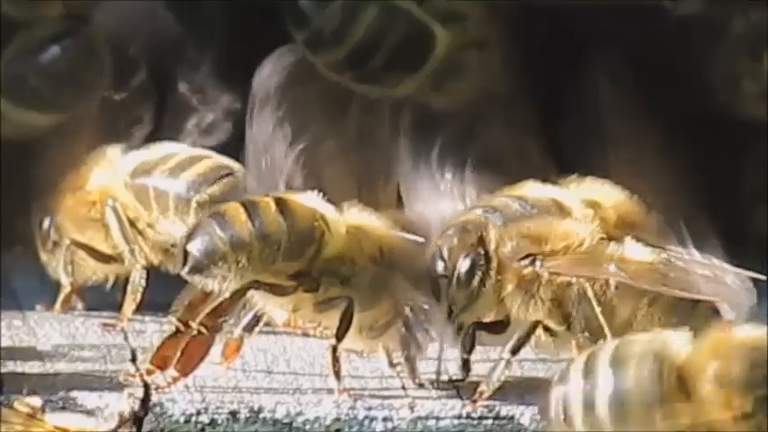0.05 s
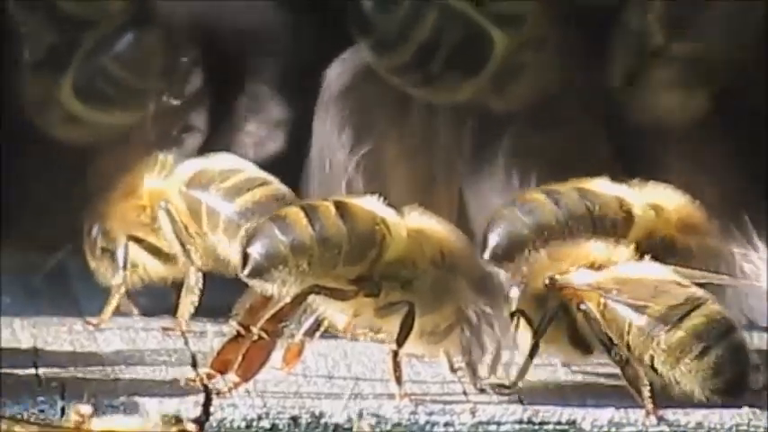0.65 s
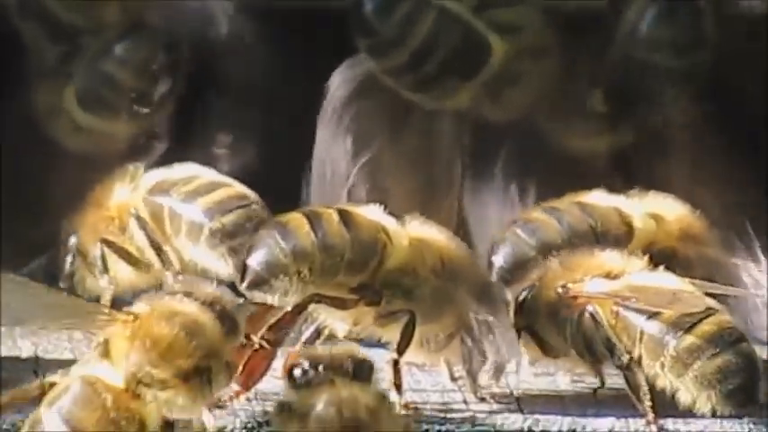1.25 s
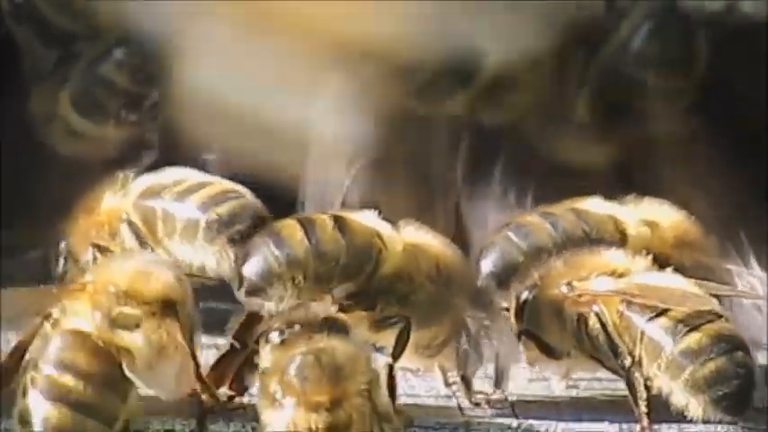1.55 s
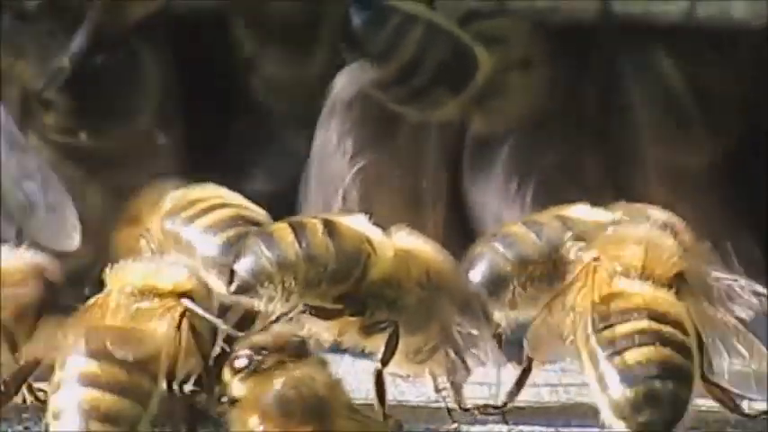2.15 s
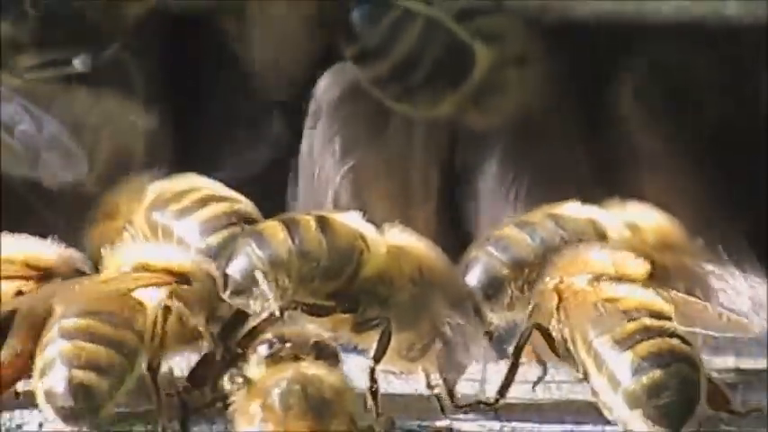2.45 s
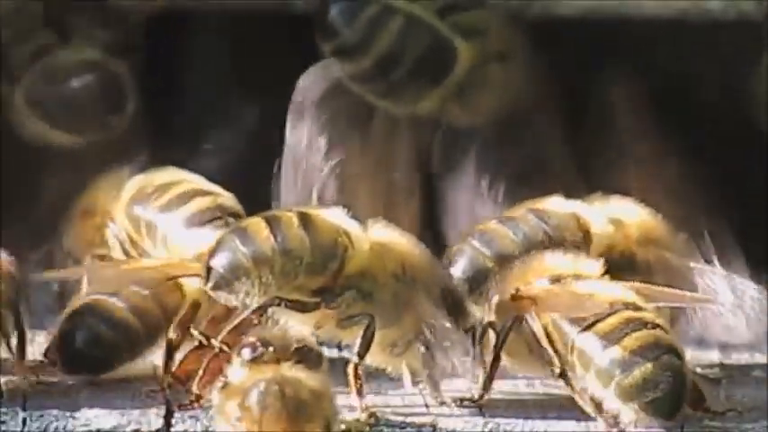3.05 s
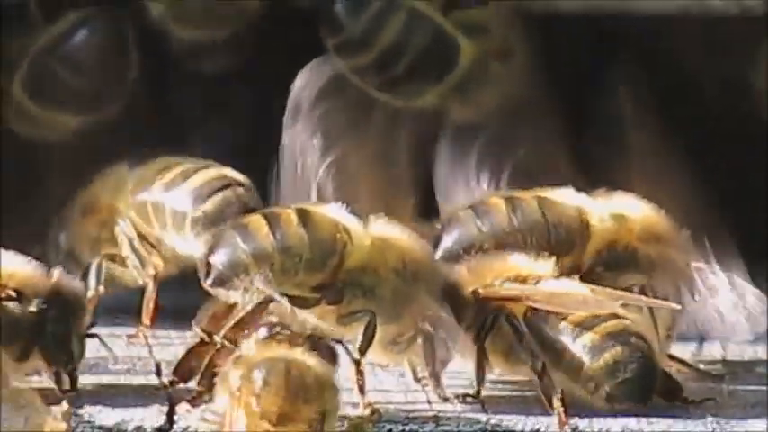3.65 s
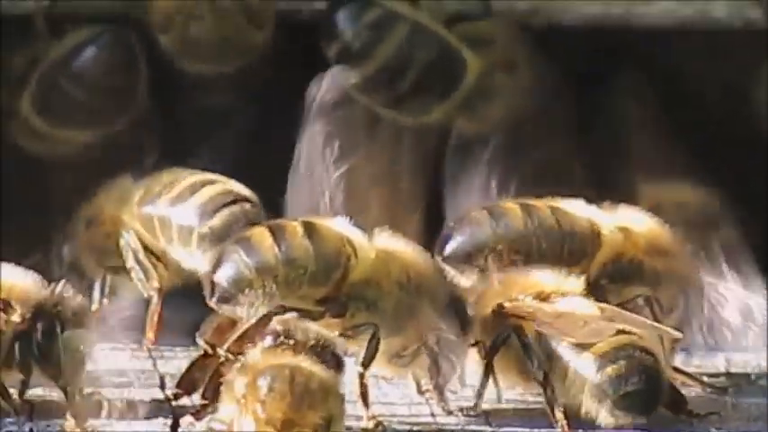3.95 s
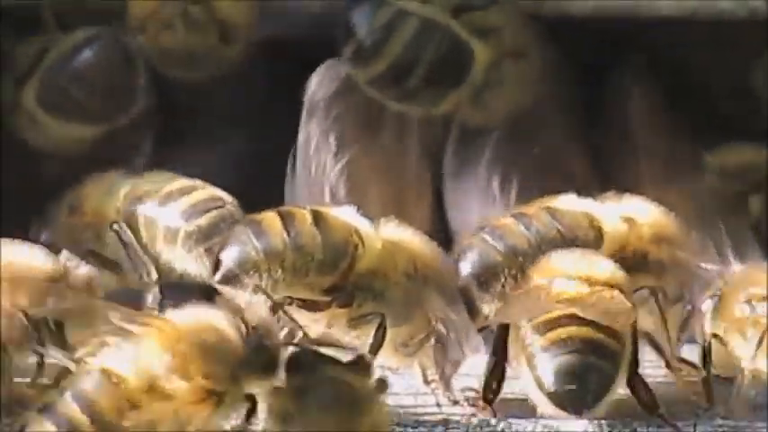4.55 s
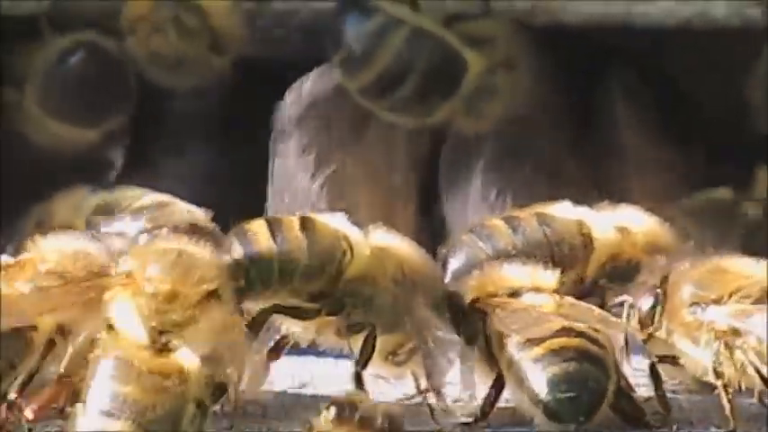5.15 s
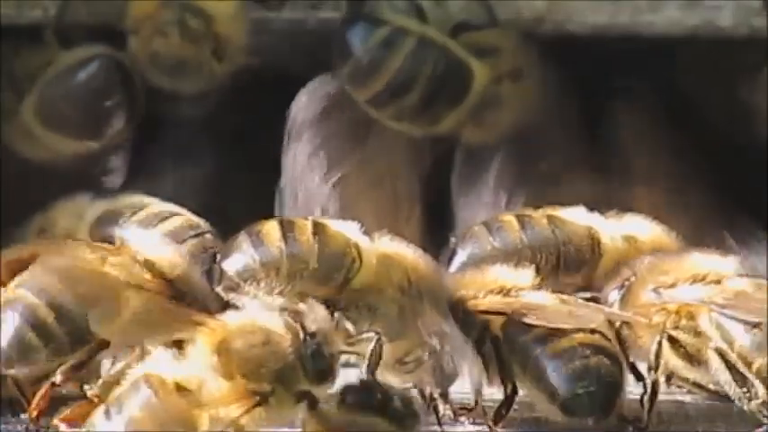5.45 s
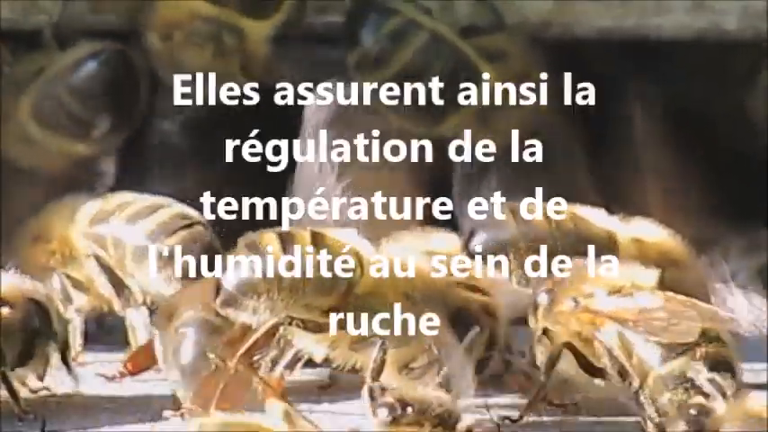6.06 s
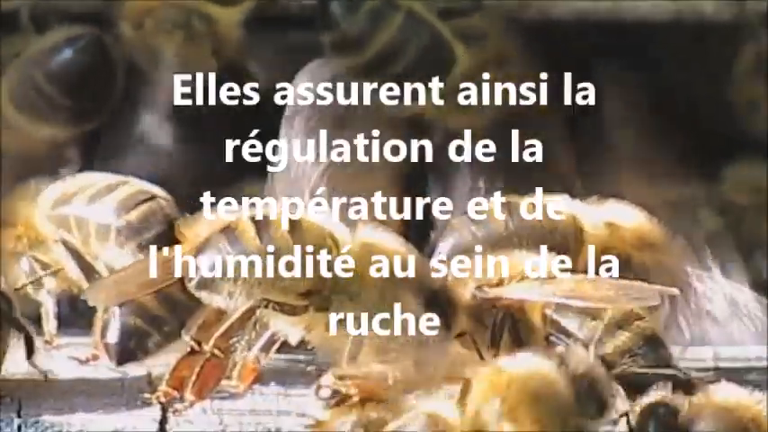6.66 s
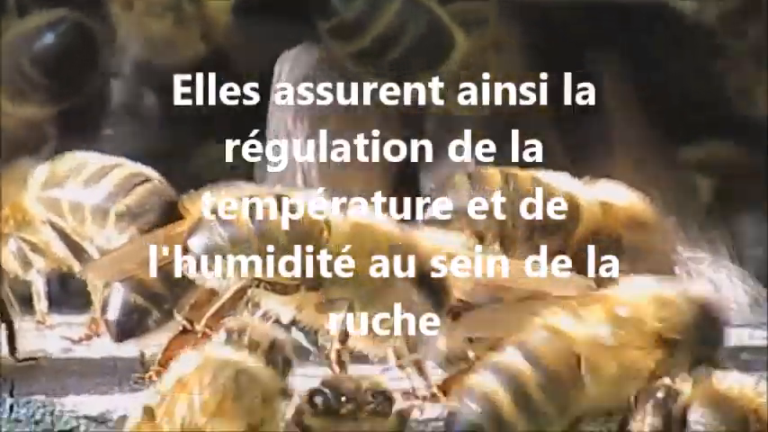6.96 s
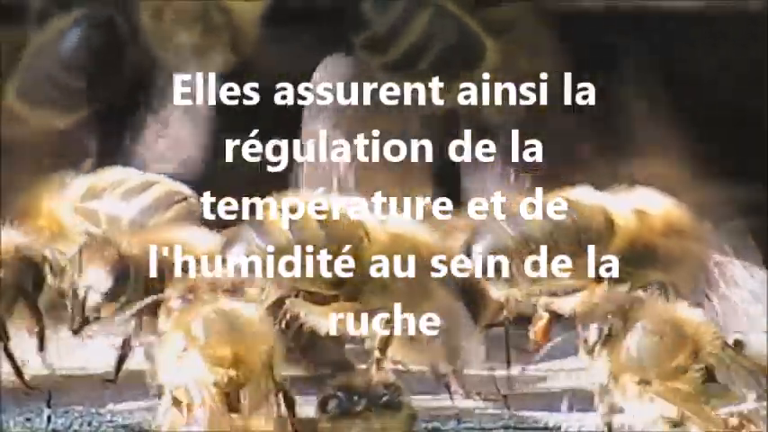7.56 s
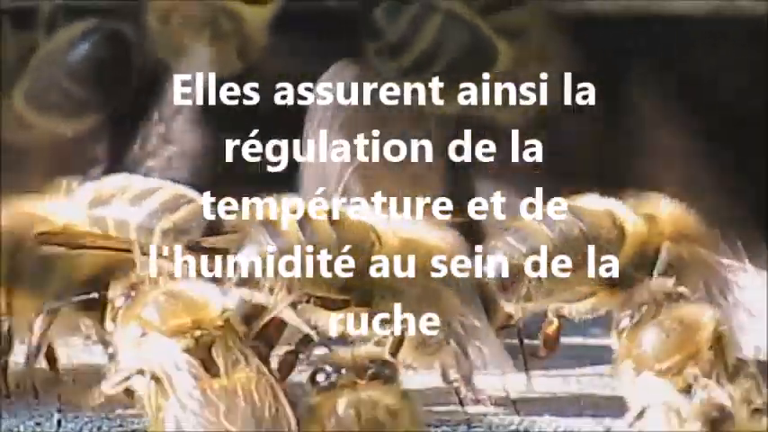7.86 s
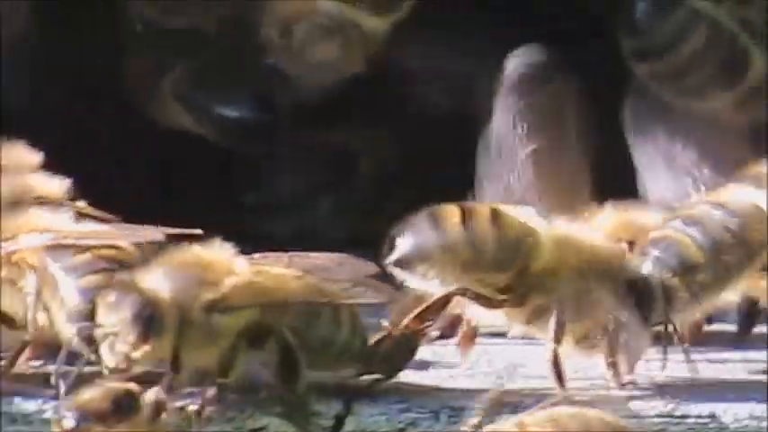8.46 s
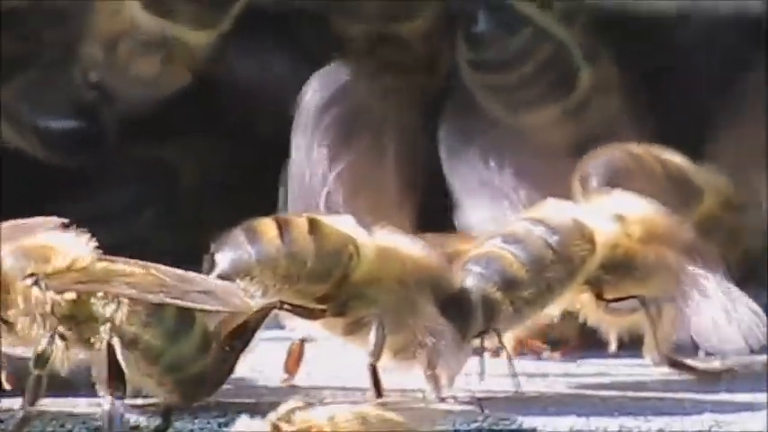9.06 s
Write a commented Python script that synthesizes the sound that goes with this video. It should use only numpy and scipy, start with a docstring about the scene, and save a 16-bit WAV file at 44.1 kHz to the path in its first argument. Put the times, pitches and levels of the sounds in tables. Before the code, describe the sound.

Honeybees fan their wings close by at an outdoor hive entrance, making a quiet, low, pulsing hum that swells and dips over a soft rush of air and faint hiss. A dull wooden knock sounds at 0.4 seconds. In the background, a bird sings four trills of quickly repeated falling notes, at about 0.2, 2.1, 4.9 and 6.7 seconds, each under a second long and echoing lightly among trees. Short chirps and whistles are scattered between 0.8 and 3.5 seconds. A buzzy, wheezing call runs from 3 to 4 seconds, then a faint, thin, distant song until about 6.3. A few more whistles come after 7.3. At 7.9 the sound drops out for a third of a second. It returns with a short rustle and a thinner, higher, softer hum. A sharp wooden tick and a tiny high bird call come around 8.9 seconds.

```python
"""Honeybees fan their wings at a hive entrance: each wingbeat pushes the air, and together
they make a low, pulsing hum over a soft rush of air. There are four birdsong trills, each a
quickly repeated falling note with its own echo. Birds also chirp, whistle and buzz among the
trees, and wood rings from two knocks. Near the end the sound drops out briefly, then comes
back with a short rustle and a thinner, higher hum."""
import sys
import numpy as np
from scipy import signal
from scipy.fft import rfft, irfft
from scipy.io import wavfile

SR = 44100
rng = np.random.default_rng(int(sys.argv[2]) if len(sys.argv) > 2 else 0)


def store_wav(level_fs):
    """Save 16-bit WAV to argv[1]."""
    pcm = np.round(np.clip(np.atleast_2d(level_fs), -1, 1) * 32767)
    wavfile.write(sys.argv[1], SR, pcm.T.astype(np.int16))


N = 410130
TIME = np.arange(N) / SR
DROPOUT_START_S, DROPOUT_END_S = 7.912, 8.237
AFTER_DROPOUT = TIME > (DROPOUT_START_S + DROPOUT_END_S) / 2
LATE_WINGBEAT_HZ = 161.5  # the bees beat faster after the dropout

# narrow treble bands that are turned down: (frequency [Hz], width [Hz], depth [dB])
TREBLE_DIPS = [(3976, 340, -11), (8000, 240, -15.5)]
# how long echoes last among the trees: (frequency [Hz], time to fade by 60 dB [s])
ECHO_TIMES = [(300, 0.16), (2000, 0.4), (3300, 0.74), (6000, 0.6), (8000, 0.033)]
# how the low rumble of moving air rises and falls: (time [s], level [dB])
RUMBLE_LEVELS = [(0, -62), (.45, -63), (.65, -56), (1, -60.5), (2.3, -65), (3, -61), (4.15, -62.5),
                 (4.32, -59), (4.5, -65), (7.9, -62.5), (8.25, -76), (9.3, -72)]
# the tone of that rumble: (frequency [Hz], level [dB])
RUMBLE_SPECTRUM = [(15, -22), (30, -12), (48, -5.5), (65, -3), (80, -5), (105, 0), (140, -34.5),
                   (220, -43.5)]
# the part of the rushing air that both ears share: (frequency [Hz], level [dB])
RUSH_SHARED = [(40, -15.5), (200, -4.5), (430, -5.5), (540, -2.5), (740, -0.5), (920, -4.5), (1150, -4.5),
               (1900, -10.5), (3400, -13), (4500, -16.5), (7000, -24), (15000, -34.5)]
# the part that is opposite at the two ears: (frequency [Hz], level [dB])
RUSH_OPPOSITE = [(20, -21), (60, -5), (130, -1), (280, 2), (680, 0.5), (920, -3), (1130, -4), (1900, -9.5),
                 (3400, -14), (4500, -16.5), (6600, -17.5), (7600, -33.5), (15000, -51.5)]
# the tone of the microphone's hiss: (frequency [Hz], level [dB])
HISS_SPECTRUM = [(500, -7), (3500, 2), (5200, 2.5), (7500, 5), (9000, 3), (13500, 1.5), (15000, -15.5)]
# the tone of the rustle: (frequency [Hz], level [dB])
RUSTLE_SPECTRUM = [(100, -33), (270, 4), (500, -1), (780, 8.5), (1100, -1), (1800, -19), (3500, -20),
                   (8000, -55)]

# a dull knock on the hive board: (time [s], level [dB], brightness [dB/octave], left over right [dB])
BOARD_KNOCKS = [(.3905, -39.5, 5, 3), (0.3922, -30, 1, 1)]
# the tones the board rings with: (frequency [Hz], level [dB], time to fade by 60 dB [s])
BOARD_TONES = [(307, -8.5, 0.077), (578, -5, 0.045), (656, -5, 0.096), (784, 3, 0.032),
               (1054, -10.5, 0.054), (1220, -7.5, 0.026), (1538, -7.5, 0.078), (1940, -9.5, 0.03),
               (2140, -13, 0.037), (2820, -14, 0.026)]
# a sharp tick and its bounce: (time [s], level [dB], brightness [dB/octave], left over right [dB])
SLAT_TICKS = [(8.8864, -30.5, 4.5, -3), (8.9017, -45, 8, 2)]
# the tones of the ticked wooden slat: (frequency [Hz], level [dB], time to fade by 60 dB [s])
SLAT_TONES = [(389, 5.5, 0.056), (516, -1.5, 0.068), (1030, 4.5, 0.015), (1250, 3.5, 0.015),
              (1800, 0.5, 0.023), (2070, 4.5, 0.0083), (2290, 0, 0.0082), (2630, -19, .007)]

# a far bird's thin song: (start [s], length [s], pitch [Hz], opening rise [octaves],
# closing fall [octaves], roughness [share of pitch], level [dB])
SONG_NOTES = [(3.84, 0.29, 6350, .04, 0, 0.013, -67), (4.25, .25, 5610, .28, 0.0088, .015, -59.5),
              (4.33, .28, 6430, 0.024, .02, .008, -66), (4.5, 0.14, 5370, 0.023, .06, 0.026, -61),
              (4.748, 0.35, 6360, 0.025, 0.0079, 0.013, -65), (5.1, 0.083, 5960, 0.11, 0.0045, 0.018, -60),
              (5.18, .2, 6090, 0.0084, .12, .014, -57.5), (5.5, .11, 5810, .05, 0, 0.021, -61),
              (5.69, .08, 5960, 0, .05, .02, -65), (6.09, .25, 5390, 0.21, 0, .035, -65)]
# tiny, very high calls: (start [s], pitch [Hz], roughness [share of pitch], level [dB])
PIP_NOTES = [(.422, 7340, 0.013, -51), (1.529, 7460, 0.038, -52), (7.765, 7380, 0.037, -51),
             (8.925, 7680, .005, -41.5)]
# held whistles: (start [s], length [s], middle pitch [Hz], slide [octaves], level [dB])
WHISTLE_NOTES = [(1.123, 0.075, 2710, -0.17, -54.5), (1.214, 0.03, 3540, -.04, -51),
                 (1.41, .045, 3470, -0.0081, -56), (1.48, 0.11, 2004, -0.036, -57),
                 (1.69, 0.044, 2700, -.08, -57), (1.8, 0.14, 1890, -0.105, -60),
                 (2.19, 0.088, 2230, -0.084, -53.5), (2.41, 0.13, 2170, -0.052, -52.5),
                 (7.36, 0.14, 2037, 0.085, -59), (7.646, 0.03, 1855, -0.025, -51.5),
                 (7.81, 0.1, 3120, -0.25, -53.5), (8.455, .035, 4520, -.03, -62)]
# short chirps: (start [s], length [s], middle pitch [Hz], slide [octaves], arch [octaves], level [dB])
CHIRP_NOTES = [(0.804, 0.025, 1210, -.3, 0, -52.5), (0.805, 0.023, 2300, -0.25, 0.0046, -49),
               (.83, 0.034, 2080, -0.505, 0.036, -50), (0.854, 0.022, 1446, -0.37, 0.053, -48.5),
               (0.978, .03, 1896, -0.54, 0.018, -43), (1.21, 0.024, 2230, 0.46, 0.17, -49.5),
               (1.241, 0.024, 1870, -0.51, 0.048, -48.5), (1.381, 0.034, 1900, -.48, 0.03, -43.5),
               (1.616, 0.033, 1934, -0.44, 0.023, -47.5), (2.098, 0.03, 1960, -0.34, -0.0077, -51),
               (2.693, 0.028, 1886, -0.45, -0.0065, -49.5), (2.979, 0.034, 2210, -0.23, 0.0093, -55),
               (3.037, 0.032, 1360, -0.25, 0.018, -50.5), (3.257, 0.015, 2060, -0.48, -0.012, -51),
               (3.435, 0.035, 2106, -.45, 0, -51), (3.473, 0.013, 2060, 0.46, 0.016, -52),
               (3.474, 0.014, 1410, 0.48, -0.022, -48), (3.49, 0.017, 1816, -0.64, -0.012, -48)]
# tones that linger around the trills and the wheeze: (frequency [Hz], width [Hz], level [dB])
LINGERING_TONES = [(2980, 30, -6), (3175, 16, -2), (3218, 16, 3), (3490, 22, 0), (3680, 20, -2),
                   (3768, 20, 3), (4040, 24, 2)]
# one falling trill note, which slows and is loudest halfway down: (time [s], pitch [Hz], level [dB])
TRILL_NOTE = [(-.005, 4330, -21), (0, 4100, -7.5), (.007, 3760, -1), (.0105, 3457, -3), (.0124, 3270, 0),
              (.0165, 3170, 5.5), (.02, 2920, 2), (.0235, 2640, -5), (.029, 2500, -28.5)]
# four trills, each with its own echo: (start [s], notes [count], first gap [s], gap growth [s/note],
# level [dB], first note offset [dB], level change [dB/note], close echo delay [s], close echo [dB],
# brightness [dB/kHz], flick before each note [dB], lingering tones [dB], far echoes [dB])
TRILL_PHRASES = [(.1755, 11, .0755, .00065, -45.5, -13, -.15, .0142, 0, 6, -12, -4, -1),
                 (2.073, 10, .069, .0004, -51, -4, .35, .0068, -6, 5, -16, 5, -2),
                 (4.899, 8, .0765, .0005, -43.5, -9, -.9, .015, .5, 3, -2, -7, -1),
                 (6.66, 12, .0641, .00095, -43, -13, -.3, .006, -9, 6, -22, 4, -7)]

# how a faint, deep tone rises and falls: (time [s], level [dB])
DRONE_LEVELS = [(6.7, -78), (6.95, -57), (7.2, -59), (7.3, -73), (7.55, -58), (7.9, -75)]
# wing overtones that stand out of the hum: (frequency [Hz], level [dB])
WING_OVERTONES = [(273, -71), (331, -71.5), (510, -67.5), (572, -68), (679, -64.5), (828, -70),
                  (952, -75.5), (1080, -68.5), (1440, -71)]
# how strong a wingbeat's overtones are: (frequency [Hz], level [dB])
WING_SPECTRUM = [(100, 1), (180, -3), (250, -12.5), (420, -10.5), (680, -21), (900, -16.5), (1500, -19),
                 (3000, -30.5)]
# loudness of the crowd of bees: (time [s], level [dB])
CROWD_LEVELS = [(0.05, -55.5), (0.22, -54.5), (2.55, -54.5), (2.85, -66), (2.95, -56), (5.42, -54),
                (7.88, -54)]
# the pitch of the lower close hum, which sags at the end: (time [s], wingbeat rate [Hz])
LOW_HUM_RATES = [(0, 136.3), (.3, 130.5), (7.45, 131.8), (7.9, 122.3)]
# uneven swells and dips of the hum near 131 Hz: (time [s], level [dB])
LOW_HUM_SWELLS = [(0.05, -59), (1.66, -58.5), (2.88, -74), (2.97, -59.5), (3.56, -59), (3.65, -75),
                  (3.89, -65), (7.23, -60.5), (7.31, -73), (7.38, -54), (7.88, -60)]
# uneven swells and dips of the hum near 152 Hz: (time [s], level [dB])
HIGH_HUM_SWELLS = [(0.05, -54), (0.16, -56.5), (2.97, -66.5), (3.06, -54.5), (5.04, -59), (5.09, -51.5),
                   (5.52, -67), (5.61, -50), (5.85, -62.5), (6.94, -54), (7.88, -75)]


def gain_of(db):
    """Turns decibels into a number to multiply a sound by."""
    return 10 ** (np.asarray(db) / 20)


def normalized(x):
    """Scales a signal so its average strength (rms) is 1."""
    return x / np.sqrt(np.mean(x ** 2) + 1e-20)


def at_frequency(table, hz):
    """Looks up a table at a frequency, with octaves evenly spaced."""
    frequencies, values = np.transpose(table)
    return np.interp(np.log(hz + 1), np.log(frequencies + 1), values)


def at_time(table, t=TIME):
    """Looks up each value column of a table at the times t."""
    times, *columns = np.transpose(table)
    return [np.interp(t, times, column) for column in columns]


def add(mix, start_s, sound):
    """Mixes a sound in at its start time."""
    part = mix[..., max(round(start_s * SR), 0):][..., :sound.shape[-1]]
    part += sound[..., :part.shape[-1]]


def excerpt(x, start_s, samples):
    """Cuts a short piece out of a signal."""
    return x[int(start_s * SR):][:samples]


def panned(x, db):
    """Makes a sound db louder on the left than on the right."""
    return x * gain_of([[db / 2], [-db / 2]])


def tone(hz):
    """A pure tone that follows a changing pitch."""
    return np.sin(2 * np.pi * np.cumsum(hz) / SR)


def noise(spectrum):
    """Noise of strength 1, shaped by a table of frequencies and levels."""
    gains = gain_of(at_frequency(spectrum, np.fft.rfftfreq(N, 1 / SR)))
    return normalized(irfft(rfft(rng.standard_normal(N)) * gains, N))


def drift(hz):
    """Random wandering of strength 1, up to about hz wiggles a second."""
    frames = N // 128
    rates = np.fft.rfftfreq(frames, N / frames / SR)
    slow = irfft(rfft(rng.standard_normal(frames)) / (1 + (rates / hz) ** 2), frames)
    return np.interp(TIME, np.linspace(0, N / SR, frames), normalized(slow - slow.mean()))


def tree_echoes(x, echoes_per_s=2000):
    """Trees scatter echoes, different at each ear; each frequency fades at its own speed."""
    echoes = rng.standard_normal((2, SR)) * (rng.random((2, SR)) < echoes_per_s / SR)
    hz, t, bands = signal.stft(echoes, SR, nperseg=256)
    fade = gain_of(-60 * t / at_frequency(ECHO_TIMES, hz)[:, None]) * (t > 0)
    tail = signal.istft(bands * fade, SR, nperseg=256)[1]
    return signal.fftconvolve(x[None], tail / np.linalg.norm(tail[0]), axes=1)[:, :N]


def leaf_scatter(note, decay_s):
    """Leaves around a bird smear its note, alike for both ears."""
    delay = np.arange(SR // 12) / SR
    paths = rng.standard_normal(len(delay)) * np.exp(-delay / decay_s)
    return signal.fftconvolve(note, paths / np.linalg.norm(paths))


def narrow_band(x, hz, width_hz):
    """Keeps only the sound close to one frequency."""
    return signal.lfilter(*signal.iirpeak(hz, hz / width_hz, SR), x)


def ringing(x, level_db):
    """Adds narrow tones that ring on after each note."""
    return x + sum(gain_of(db + level_db) * narrow_band(x, hz, width)
                   for hz, width, db in LINGERING_TONES)


def air(shared_db=-52, opposite_db=-49.5, hiss_db=-58):
    """Moving air makes a wide rush and a low rumble; the microphone adds hiss."""
    shared = gain_of(shared_db) * noise(RUSH_SHARED)
    opposite = gain_of(opposite_db) * noise(RUSH_OPPOSITE)
    flutter = gain_of(-.58 * drift(.8) + drift(14))
    rush = np.array([shared + opposite, shared - opposite]) * flutter
    rumble = gain_of(at_time(RUMBLE_LEVELS)[0] + 2.5) * noise(RUMBLE_SPECTRUM)
    return rush + rumble + gain_of(hiss_db) * noise(HISS_SPECTRUM)


def rustle(peak_s=8.345, peak_db=-43, rise_db_per_s=155.5, fall_db_per_s=260):
    """A short brush of noise, different at each ear."""
    t = TIME - peak_s
    db = peak_db - np.maximum(-t * rise_db_per_s, t * fall_db_per_s)
    return gain_of(db) * np.array([noise(RUSTLE_SPECTRUM), noise(RUSTLE_SPECTRUM)])


def struck_wood(blows, tones, phase_shift, echo_db, attack_s=.00034):
    """Light blows make wood ring with fading tones, each a little out of step at the two ears."""
    out, t = np.zeros((2, N)), np.arange(SR // 5) / SR
    attack = 1 - np.exp(-(t / attack_s) ** 2)
    for start, db, brightness, pan_db in blows:
        for (hz, tone_db, fade_s), side in zip(tones, rng.choice([-1, 1], len(tones))):
            ring_db = db + tone_db + brightness * np.log2(hz / 1000) - 60 * t / fade_s
            ear_phase = side * phase_shift * np.array([[1], [-1]])
            ring = gain_of(ring_db) * np.sin(2 * np.pi * hz * t + ear_phase)
            add(out, start, panned(ring * attack, pan_db))
    return out + gain_of(echo_db) * tree_echoes(out.mean(0))


def bird_note(hz, db, taper):
    """A pure sung note; taper is the share of it spent fading in and out."""
    return gain_of(db) * signal.windows.tukey(len(hz), taper) * tone(hz)


def pitch_wobble(slow, fast):
    """The unsteadiness of a bird's pitch, as a factor near 1."""
    return 1 + slow * drift(40) + fast * drift(300)


def sliding_notes(notes, wobble, taper):
    """Bird notes that slide evenly through their middle pitch."""
    out = np.zeros(N)
    for start, length, middle_hz, octaves, db in notes:
        position = np.linspace(-.5, .5, int(length * SR))
        hz = middle_hz * 2 ** (octaves * position) * excerpt(wobble, start, len(position))
        add(out, start, bird_note(hz, db, taper))
    return out


def far_song(rise_s=.036, fall_s=.042, attack_s=.04, fade_db_per_s=9.5):
    """A far bird's thin notes rise to a held pitch, sag at the end and echo among the trees."""
    voice, slow, fast = np.zeros(N), drift(40), drift(300)
    for start, length, hz, rise, fall, rough, db in SONG_NOTES:
        t = np.arange(0, length, 1 / SR)
        octaves_below = rise * np.exp(-(t / rise_s) ** 2) + fall * np.exp(-((length - t) / fall_s) ** 2)
        wobble = excerpt(1 + .004 * slow + rough * fast, start, len(t))
        note = bird_note(hz * 2 ** -octaves_below * wobble, db - fade_db_per_s * t, taper=.1)
        add(voice, start, np.minimum(t / attack_s, 1) * note)
    return gain_of(2.5) * voice + gain_of(-2) * tree_echoes(voice)


def pips(length_s=.02, slide_octaves=-.035):
    """Very short, high bird calls that fall slightly."""
    voice = np.zeros(N)
    for start, hz, rough, db in PIP_NOTES:
        wobble = pitch_wobble(slow=.003, fast=rough)
        voice += sliding_notes([(start, length_s, hz, slide_octaves, db)], wobble, taper=.44)
    return gain_of(-3) * voice + tree_echoes(voice)


def whistles():
    """Birds hold longer, nearly level notes among the trees."""
    voice = sliding_notes(WHISTLE_NOTES, pitch_wobble(slow=.008, fast=.026), taper=.16)
    return gain_of(-1.5) * panned(voice, -2) + gain_of(-4) * tree_echoes(voice)


def chirps(echo_s=.065, echo_db=-13, leaves_db=-6):
    """Quick, raspy bird notes, mostly falling, each smeared by leaves and with one clear echo."""
    voice, wobble = np.zeros(N), pitch_wobble(slow=.0076, fast=.024)
    for start, length, middle_hz, octaves, arch, db in CHIRP_NOTES:
        position = np.linspace(-.5, .5, int(length * SR))
        hz = middle_hz * 2 ** (octaves * position - arch * (2 * position) ** 2)
        note = bird_note(hz * excerpt(wobble, start, len(hz)), db, taper=.2)
        add(voice, start, note)
        add(voice, start, gain_of(leaves_db) * leaf_scatter(note, decay_s=.017))
        add(voice, start + echo_s, gain_of(echo_db) * note)
    return gain_of(-.5) * panned(voice, -2) + gain_of(-5) * tree_echoes(voice)


def wheeze(start_s=3.06, end_s=4.02, low_hz=3300, high_hz=4050, buzz_hz=95, level_db=-58.5):
    """A bird's voice box makes two tones at once, shaken into a buzz that rises and grows harsher."""
    progress = np.interp(TIME, (start_s, end_s), (0, 1))
    fade_in, fade_out = (TIME - start_s) / .024, (end_s - TIME) / .12
    loudness = gain_of(level_db) * np.clip(np.minimum(fade_in, fade_out), 0, 1)
    buzz = tone(buzz_hz * (1 + .3 * drift(59.77)))
    buzz_depth = .09 * (.72 + .28 * progress)
    bend = 1 + .03 * progress + buzz_depth * buzz
    low = tone(low_hz * (bend + .0285 * drift(265)))
    high = tone(high_hz * (bend + .09 * drift(265)))
    high_gain = gain_of(-8.5 + 13.5 * progress)  # the upper tone slowly takes over
    call = loudness * np.sqrt(2) * (low + high_gain * high) / np.hypot(1, high_gain)
    return call + gain_of(-3) * tree_echoes(call)


def trills(warm_up_notes=1.7, quickening=.025, dulling_db_per_khz=.32, flick_lead_s=.009):
    """Each trill repeats a falling note about 14 times a second, starting softly, slowing and dulling."""
    t = np.arange(TRILL_NOTE[0][0], TRILL_NOTE[-1][0], 1 / SR)
    out, far = np.zeros(N), np.zeros(N)
    rasp = .015 * drift(110) + .016 * drift(600)
    flick_hz = 3460 * 2 ** (.06 * np.linspace(-.5, .5, int(.02 * SR)))  # a tiny rise before each note
    for (start, count, gap, growth, level_db, first_db, change_db,
         echo_s, echo_db, brightness, flick_db, ring_db, far_db) in TRILL_PHRASES:
        near = np.zeros(N)
        for k in range(round(count)):
            beat_s = start + k * gap + growth * k * (k - 1) / 2
            note_s = beat_s + t[0]
            random_pitch, random_speed, random_level, random_delay = rng.standard_normal(4)
            tuning = 1 + .0079 * random_pitch
            speed = 1 + .05 * random_speed + quickening * (k - count / 2)  # later notes fall faster
            shape_hz, shape_db = at_time(TRILL_NOTE, t.mean() + (t - t.mean()) * speed)
            hz = shape_hz * (tuning + excerpt(rasp, note_s, len(t)))
            offset_khz = (hz - hz.mean()) / 1000
            effort_db = level_db + first_db * np.exp(-k / warm_up_notes) + change_db * k
            note_db = effort_db + shape_db + (brightness - dulling_db_per_khz * k) * offset_khz
            note = bird_note(hz, note_db, taper=.15)
            echo = bird_note(hz, note_db - 4 * offset_khz, taper=.15)  # the close echo is duller
            flick = bird_note(flick_hz * tuning, effort_db + flick_db, taper=.6)
            add(near, note_s, note)
            add(near, beat_s - flick_lead_s, flick)
            add(near, note_s + echo_s * (1 + .04 * random_delay), gain_of(echo_db + random_level) * echo)
            add(near, note_s, gain_of(-9) * leaf_scatter(note, decay_s=.012))
            add(far, note_s, gain_of(far_db) * note)
        out += ringing(near, ring_db)
    return out + tree_echoes(far)


def deep_drone(hz=65):
    """A deep tone swells under the hum for about a second."""
    playing = (TIME > DRONE_LEVELS[0][0]) * (TIME < DROPOUT_END_S)
    return playing * gain_of(at_time(DRONE_LEVELS)[0]) * np.sqrt(2) * np.sin(2 * np.pi * hz * TIME)


def wing_overtones(waver=.022, flutter_db=3.5):
    """Faint higher tones from the crowd's wings waver, come and go, alike at both ears."""
    out = np.zeros(N)
    for hz, db in WING_OVERTONES:
        flutter = gain_of(flutter_db * drift(12))
        out += gain_of(db) * normalized(flutter * tone(hz * (1 + waver * drift(15.2))))
    return out


def wingbeat(hz):
    """One bee pushes the air with every beat; the overtones reach each ear by different paths."""
    multiples = np.arange(1, 20)
    phase = 2 * np.pi * (rng.random(len(multiples)) + rng.random((2, len(multiples))) * (multiples > 1))
    cycle = np.linspace(0, 1, 1024)
    strengths = gain_of(at_frequency(WING_SPECTRUM, multiples * hz.mean()))
    waves = np.cos(2 * np.pi * multiples[:, None] * cycle + phase[..., None])
    one_beat = (strengths[:, None] * waves).sum(1)
    place_in_beat = np.cumsum(hz) / SR % 1
    return np.sqrt(2) * np.array([np.interp(place_in_beat, cycle, ear) for ear in one_beat])


def bee_crowd(count=10, early_hz=135.04, late_db=-66, wander=.035, flutter_db=2.5):
    """Many bees fan at different rates, so their hum pulses; higher and softer after the dropout."""
    hz = np.where(AFTER_DROPOUT, LATE_WINGBEAT_HZ, early_hz)
    db = np.where(AFTER_DROPOUT, late_db, at_time(CROWD_LEVELS)[0] - 3)
    spread = np.where(AFTER_DROPOUT, .05, .19)  # how far the rates differ, as a share of the middle one
    hum = np.zeros((2, N))
    for offset in np.linspace(-1, 1, count):
        bee = wingbeat(hz * (1 + offset * spread + wander * drift(2.5)))
        hum += bee * gain_of(flutter_db * drift(3.5))
    return gain_of(db + .5 * drift(5)) * hum / np.sqrt(count)


def close_hum(early_high_hz=152.4, late_db=-65, wander=.015, waver=.026, flutter_db=3):
    """Nearby wings hum at two pitches that swell and dip; only the higher returns after the dropout."""
    low_hz = at_time(LOW_HUM_RATES)[0]
    low_db = at_time(LOW_HUM_SWELLS)[0] + .5
    high_hz = np.where(AFTER_DROPOUT, LATE_WINGBEAT_HZ, early_high_hz) * (1 + wander * drift(.603))
    high_db = np.where(AFTER_DROPOUT, late_db, at_time(HIGH_HUM_SWELLS)[0] - 1.5)
    low, high = (wingbeat(hz * (1 + waver * drift(14.36))) * gain_of(db + flutter_db * drift(14))
                 for hz, db in ((low_hz, low_db), (high_hz, high_db)))
    return low * ~AFTER_DROPOUT + high


def scene():
    """The hive entrance in front, the birds behind."""
    knock = struck_wood(BOARD_KNOCKS, BOARD_TONES, phase_shift=.28, echo_db=-13.5)
    tick = struck_wood(SLAT_TICKS, SLAT_TONES, phase_shift=.87, echo_db=-19)
    birds = trills() + ringing(wheeze(), level_db=2) + chirps() + whistles() + far_song() + pips()
    bees = close_hum() + bee_crowd() + wing_overtones()
    return bees + deep_drone() + air() + rustle() + birds + knock + tick


def record(dry, drop_db=-13, fade_db_per_s=900, cutoff_hz=15050):
    """Turns down two narrow treble bands, drops briefly to silence and cuts the highest treble."""
    for hz, width, depth_db in TREBLE_DIPS:
        dry = dry - (1 - gain_of(depth_db)) * narrow_band(dry, hz, width)
    inside_s = np.minimum(TIME - DROPOUT_START_S, DROPOUT_END_S - TIME)
    dry = dry * gain_of(np.where(inside_s > 0, drop_db - fade_db_per_s * inside_s, 0))
    low_pass = signal.firwin(511, cutoff_hz, window=("kaiser", 9), fs=SR)
    return signal.oaconvolve(dry, low_pass[None], "same")


dry = scene()
out = record(dry)
store_wav(out)
```